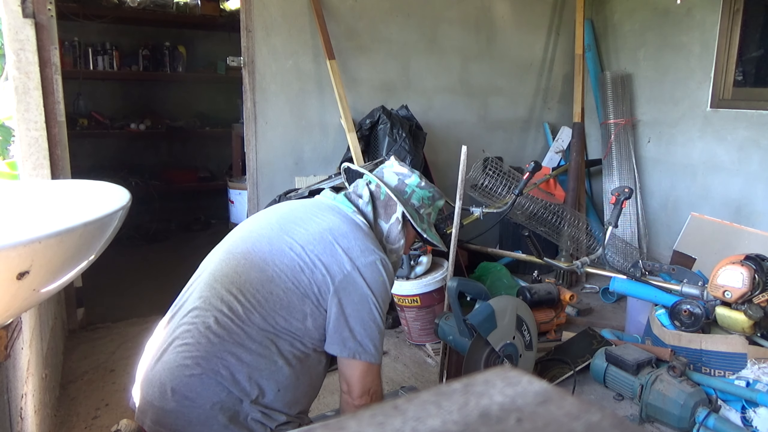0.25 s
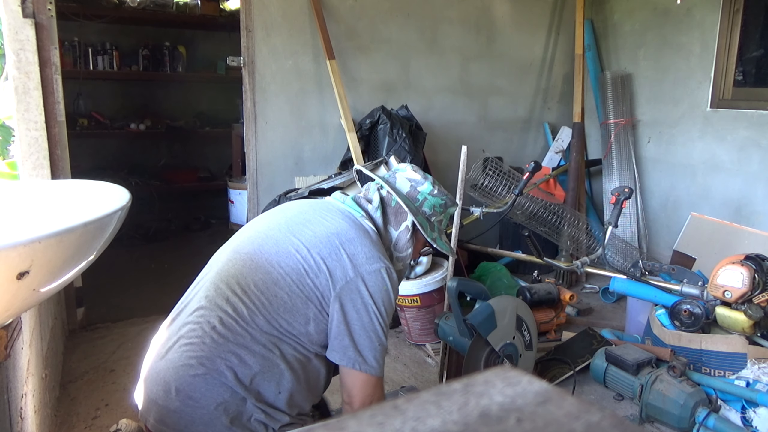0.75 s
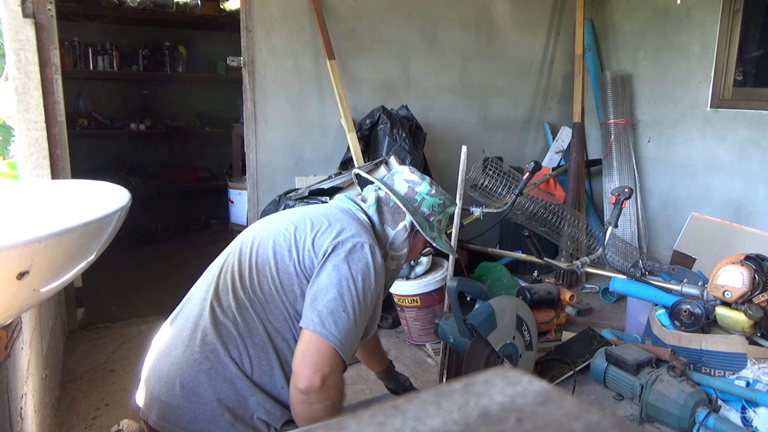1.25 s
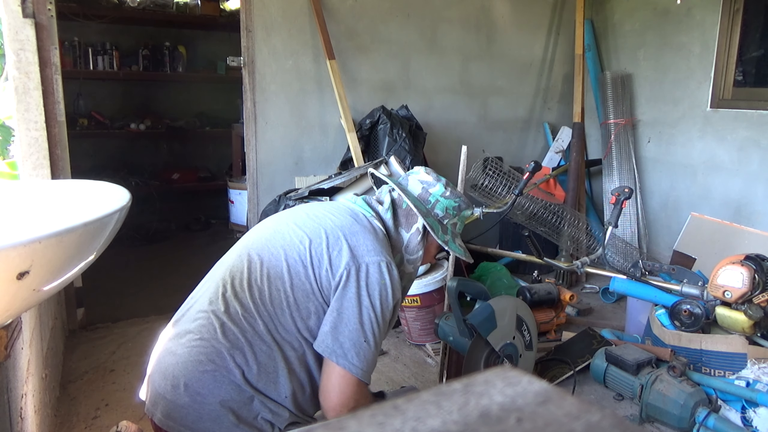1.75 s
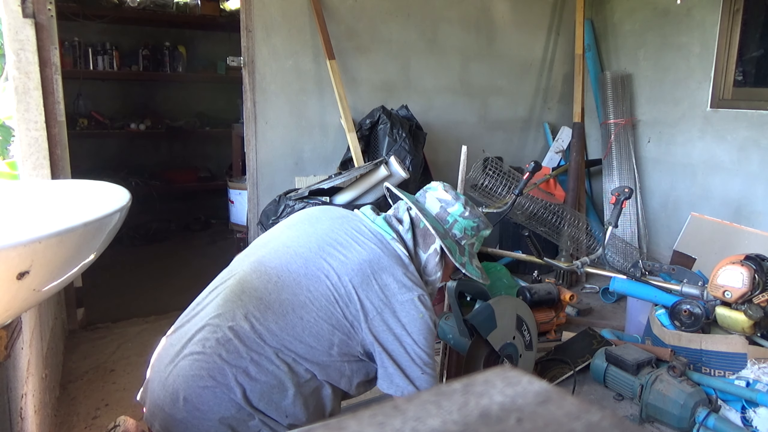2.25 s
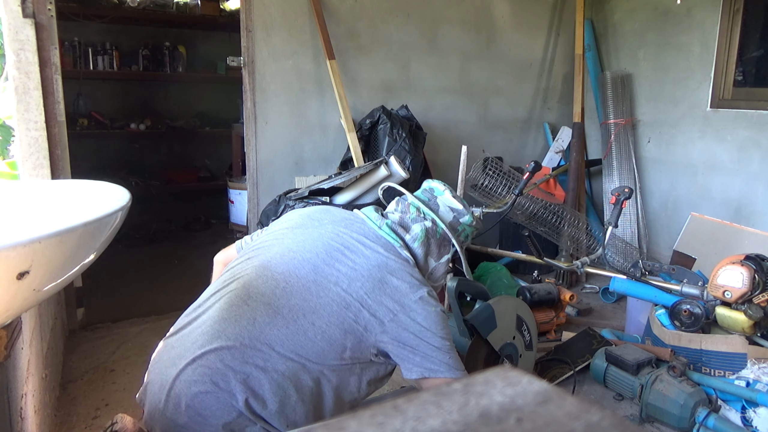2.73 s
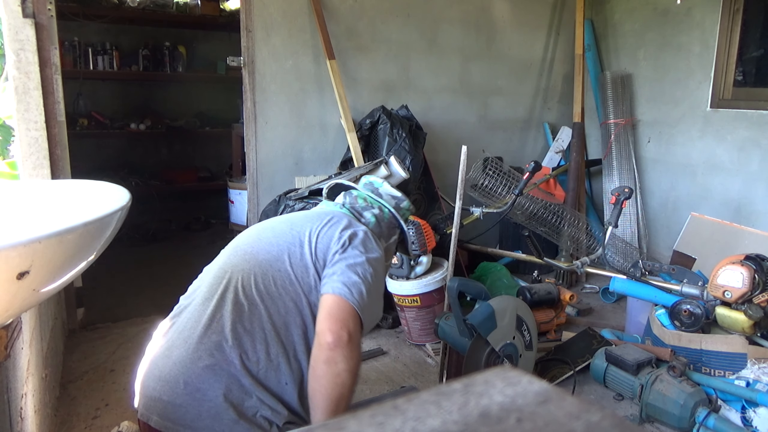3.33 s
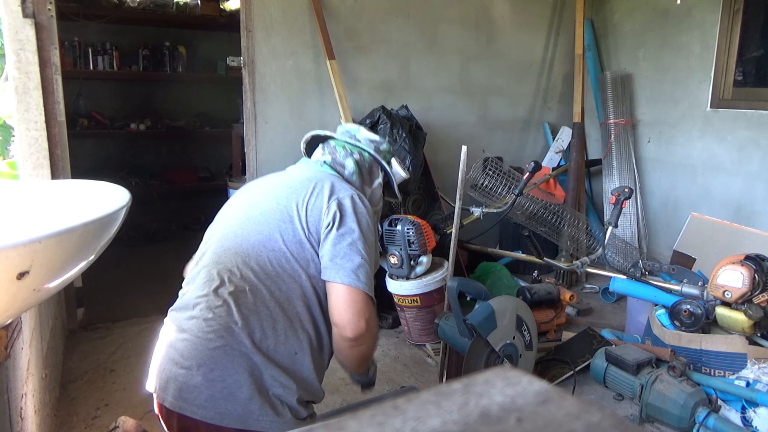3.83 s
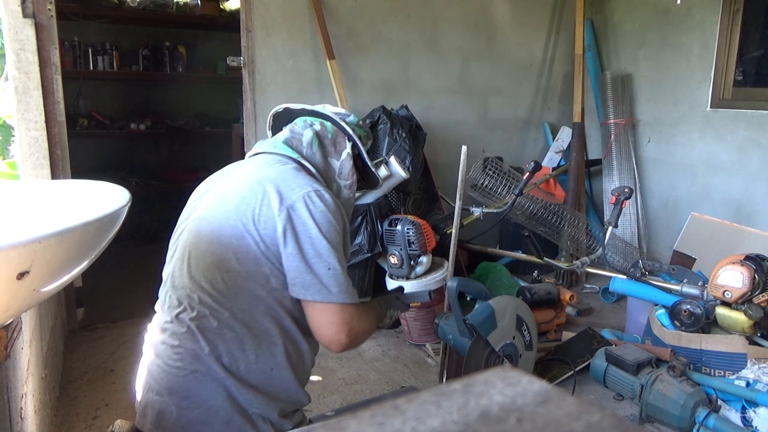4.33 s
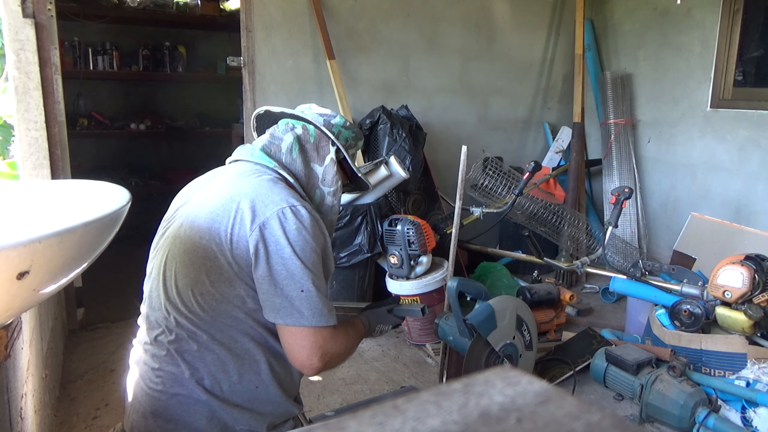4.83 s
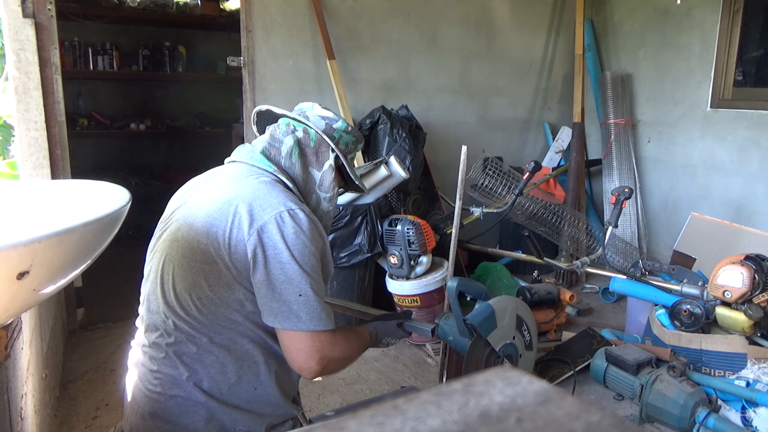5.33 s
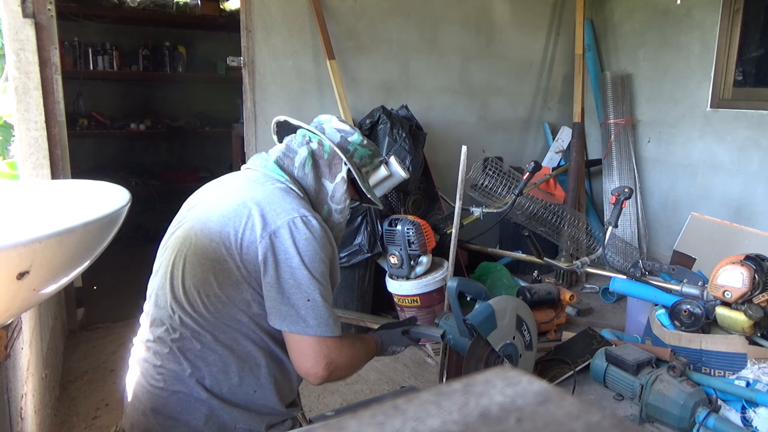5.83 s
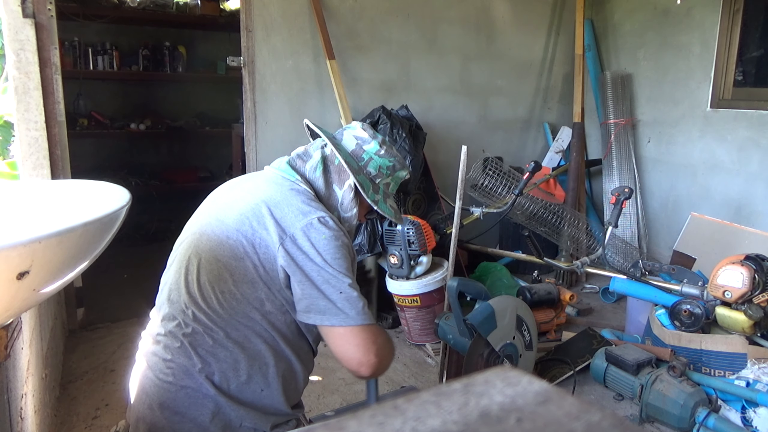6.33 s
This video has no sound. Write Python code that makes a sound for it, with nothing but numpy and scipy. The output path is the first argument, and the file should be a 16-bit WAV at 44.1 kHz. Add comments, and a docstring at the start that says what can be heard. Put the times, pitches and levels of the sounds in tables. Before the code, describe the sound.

In a small workshop, an abrasive saw coasts down, its whine sinking through bright brush hiss and gear rattle. Steel knocks, clinks and chatters on its base, then a metal tube drops in two clattering bouts, cracking and ringing. The saw fades alone to near silence, followed by light taps, a faint swish and a slide. One close microphone, short room reverberation.

```python
"""Small workshop: an abrasive chop saw coasts down, its motor tones sinking, gears rattling, brushes and bearings hissing.
At first draughts puff and steel knocks, clinks and chatters: decaying sines and noise bursts.
From 2.3 s and again from 2.9 s a length of tube drops, each contact cracking and restarting its ringing modes.
Towards the end the noise fades, taps sound, a tube is swung (noise and whistle gliding in pitch), then slides."""
import sys
import numpy as np
from scipy import signal
from scipy.fft import rfft, irfft, next_fast_len
from scipy.io import wavfile

SR = 44100
rng = np.random.default_rng(int(sys.argv[2]) if len(sys.argv) > 2 else 0)


def dump_mix(stems):
    """Bounce the given channels to the path in sys.argv[1] as a 16-bit WAV at rate SR."""
    frames = np.atleast_2d(stems).T  # one column per channel
    limited = np.clip(frames, -1, 1)  # hard clip at full scale
    pcm = np.round(limited * 32767).astype(np.int16)
    wavfile.write(sys.argv[1], SR, pcm)


N = 290178


def from_db(db):
    """Decibels to amplitude gain."""
    return 10 ** (np.asarray(db) / 20)


def rms_one(x):
    """Scale to rms 1."""
    return x / np.sqrt(np.mean(x ** 2) + 1e-20)


def in_time(rows):
    """Columns of a curve table, interpolated at every sample."""
    s, *columns = np.transpose(rows)
    return [np.interp(np.arange(N) / SR, s, column) for column in columns]


def band(x, low_hz, high_hz):
    """Butterworth band-pass."""
    edges_hz = [low_hz, min(high_hz, .45 * SR)]
    return signal.sosfilt(signal.butter(2, edges_hz, "band", fs=SR, output="sos"), x)


def drift(rate_hz):
    """Slow random wander of rms 1: noise through two equal poles, computed every 40 samples."""
    r = np.exp(-80 * np.pi * rate_hz / SR)
    noise = rng.standard_normal(N // 40 + 2002)
    slow = signal.lfilter([1], [1, -2 * r, r * r], noise)[2000:]   # settled part
    return np.interp(np.arange(N) / 40, np.arange(len(slow)), rms_one(slow))


def colour(x, spectrum=((1, 0), (2, 0)), modes_hz=(), modes_db=(), q=50):
    """Shape by a smooth spectrum with resonances standing above it."""
    size = next_fast_len(N + SR // 4)
    hz = np.arange(size // 2 + 1) * SR / size + 1
    points_hz, points_db = np.transpose(spectrum)
    smooth = from_db(np.interp(np.log(hz), np.log(points_hz), points_db))
    power = 1
    for mode_hz, mode_db in zip(modes_hz, modes_db):
        power = power + from_db(2 * mode_db) / (1 + (2 * q * (hz / mode_hz - 1)) ** 2)
    return irfft(rfft(x, size) * np.sqrt(power) * smooth, size)[:N]


def grains(per_s, spread_db):
    """Random clicks of uneven size over a bed of noise."""
    sizes = from_db(spread_db * np.minimum(rng.exponential(1, N), 5)) * rng.choice([-1, 1], N)
    clicks = sizes * (rng.random(N) < per_s / SR)
    return rms_one(clicks) + .5 * rng.standard_normal(N)


def burst(at_s, t60_s):
    """Envelope that jumps to 1 and decays exponentially."""
    age_s = np.arange(N) / SR - at_s
    return (age_s >= 0) * from_db(-60 * np.clip(age_s, 0, 1) / t60_s)


# Still workshop. Each row: frequency in Hz, relative density in dB per Hz.
SHOP_SPECTRUM = [(30, -12.5), (50, -2), (110, -10), (170, -12.5), (250, -3.5), (400, -9.5), (700, -18.5),
                 (1700, -22), (4000, -31), (7500, -30), (15600, -39.5)]
SHOP_RMS_DB = -62


def still_workshop():
    """Steady noise of a fixed spectrum."""
    return from_db(SHOP_RMS_DB) * rms_one(colour(rng.standard_normal(N), SHOP_SPECTRUM))


# Puffs. Each row: centre in seconds, level in dB, half width at 1/e in seconds.
GUSTS = [(0.056, -41.5, 0.043), (0.152, -47, .025), (0.3, -46.5, 0.11)]


def draught():
    """Air puffs on the microphone: low noise under bell-shaped envelopes."""
    t = np.arange(N) / SR
    puffs = sum(from_db(db) * np.exp(-((t - s) / width_s) ** 2) for s, db, width_s in GUSTS)
    return puffs * rms_one(band(rng.standard_normal(N), 28, 108))


# Steel on the saw base. Each row: start in seconds, level in dB, lower mode in Hz.
KNOCKS = [(0.077, -28, 603), (0.237, -41, 590), (0.454, -27.5, 640), (0.631, -24, 662), (0.74, -18.5, 492),
          (0.934, -21, 606), (1.032, -21.5, 485), (1.063, -22, 505), (1.093, -17, 545), (1.14, -28, 510),
          (1.204, -25, 626)]


def base_knocks():
    """A blow excites two neighbouring panel modes of the base, 1 : 1.35 in pitch."""
    out, age_s = np.zeros(N), np.arange(SR // 4) / SR
    for s, db, hz in KNOCKS:
        pair = np.sin(2 * np.pi * hz * age_s) + .5 * np.sin(2.7 * np.pi * hz * age_s)
        out[round(s * SR):][:len(age_s)] += from_db(db - 60 * age_s / 0.048) * pair
    return band(out, 280, 2300)


# Small clinks. Each row: start in seconds, level in dB, frequency in Hz, t60 in seconds.
CLINKS = [(0.037, -36, 2570, 0.11), (0.281, -30, 2430, 0.081), (0.281, -22, 2190, 0.071),
          (0.469, -22, 6340, 0.11), (0.495, -16.5, 9230, 0.076), (0.939, -23, 7250, 0.05),
          (1.467, -16.5, 8580, 0.051), (3.819, -33, 10700, 0.088), (3.822, -33, 2650, 0.08)]


def clinks():
    """Each is one decaying mode."""
    out, age_s = np.zeros(N), np.arange(SR // 4) / SR
    for s, db, hz, t60_s in CLINKS:
        ring = from_db(db - 60 * age_s / t60_s) * np.sin(2 * np.pi * hz * age_s)
        out[round(s * SR):][:len(age_s)] += ring
    return out


# Steel chatter. Each row: start in seconds, level in dB.
JOLTS = [(0.299, -22), (0.439, -21), (0.869, -25), (0.939, -16), (1.08, -19), (1.148, -19), (1.194, -20),
         (1.349, -17.5), (1.4, -17)]


def fence_chatter():
    """Steel chatters on the fence: short bursts of bright noise."""
    level = sum(from_db(db) * burst(s, 0.075) for s, db in JOLTS)
    return band(level * rng.standard_normal(N), 2300, 10400)


# Taps and last jolts of the wheel.
# Each row: start in seconds, level in dB, low edge in Hz, high edge in Hz, t60 in seconds.
TAPS = [(5.776, -46, 3000, 9000, 0.065), (5.829, -44.5, 3000, 11900, 0.065),
        (5.918, -48, 4470, 13000, 0.043), (6.433, -45.5, 1500, 12900, 0.074), (6.436, -49, 200, 900, 0.024),
        (6.438, -51, 3900, 4470, 0.054), (6.546, -44, 120, 1800, 0.012), (6.565, -60, 1820, 1960, 0.1)]


def taps():
    """Decaying noise bursts, each confined to its own band."""
    noise, out = rng.standard_normal(N), np.zeros(N)
    for s, db, low_hz, high_hz, t60_s in TAPS:
        tap = band(band(burst(s, t60_s) * noise, low_hz, high_hz), low_hz, high_hz)
        out += from_db(db) * tap * np.sqrt(SR / 2 / (high_hz - low_hz))   # make up for band width
    return out


# Tube sliding. Each row: time in seconds, level in dB.
SLIDE = [(6.43, -96), (6.45, -62), (6.58, -63.5)]


def tube_slide():
    """Friction as grainy bright noise."""
    level_db = np.interp(np.arange(N) / SR, *np.transpose(SLIDE), left=-200)
    return from_db(level_db) * rms_one(band(grains(1800, 3.2), 3200, 10000))


# Tube modes. Each row: family number, frequency in Hz.
FIRST_PITCHES, SECOND_PITCHES = [(0, 1791), (1, 2272), (1, 2528), (2, 3577), (2, 3655), (2, 3768),
                                 (3, 4034), (3, 4081), (4, 5373), (4, 5512), (5, 5850), (6, 7335)], [(0, 1836), (1, 2255), (2, 3461), (2, 3720), (3, 4118),
                                                   (4, 5478), (5, 5984), (5, 6292), (6, 6573), (6, 6724),
                                                   (6, 7140), (6, 7540), (6, 9985), (6, 10620)]
# Ringing of those modes. Each row: relative level in dB, t60 in seconds, rise time constant in seconds.
FIRST_MODES, SECOND_MODES = [(-2, 1.9, 0.023), (-7, 0.4, .003), (-11, 2.3, 0.028), (7, 0.96, 0.021),
                             (2.5, 1.5, 0.019), (8, 1.6, 0.009), (-7, 0.4, 0.003), (-3, 0.3, 0.0026),
                             (12, 0.97, .002), (-10.5, 0.41, .005), (-4, 0.43, 0.0014), (2, 0.71, .005)], [(3, 0.44, 0.0063), (1, 0.36, 0.0026), (4, 0.38, 0.034),
                                                 (2, 0.28, 0.017), (-2, 0.22, 0.0015), (-2, 0.13, .002),
                                                 (-3, 0.96, .002), (-7, 0.51, .002), (-0.5, 0.069, 0.0052),
                                                 (-56, 0.084, 0.0018), (-5, 0.084, .002), (-4.5, 0.1, .002),
                                                 (-4, 0.1, 0.0015), (-6, 0.084, .002)]
# Contacts. Each row: time in seconds, crack in dB, then ring in dB of families 0 to 6 after it.
FIRST_DROP, SECOND_DROP = [(2.3386, -2.5, -19, -27.5, -26.5, -10.5, -40, -15.5, -29.5),
                           (2.401, -26, -37, -43.5, -32, -25, -47, -45, -33.5),
                           (2.464, -17, -23, -26, -75, -15, -44, -52.5, -55),
                           (2.493, -32, -33, -31, -38, -17.5, -62, -19, -57),
                           (2.515, -31, -25.5, -25.5, -45.5, -27.5, -61.5, -23, -49),
                           (2.547, -13.5, -30.5, -46, -35, -19, -36, -52.5, -41.5),
                           (2.583, -37, -45.5, -23, -56, -15, -56.5, -20, -47.5),
                           (2.606, -30, -38, -25.5, -50, -20.5, -39.5, -28, -44),
                           (2.645, -12, -62, -59.5, -50, -24, -54, -42, -38),
                           (2.685, -21, -56, -57, -67, -50, -62, -60, -60)], [(2.862, -7, -41, -26.5, -28, -15, -23, -26, -20),
                                               (2.96, -23, -59, -60, -42, -50, -50, -32, -60),
                                               (3.03, -50, -63, -72, -52, -70, -69, -70, -70),
                                               (3.265, -19, -34, -66, -60, -22.5, -40, -50, -22),
                                               (3.34, -46, -51, -70, -70, -56, -70, -70, -70)]


def dropped_tube(pitches, modes, contacts):
    """Each contact cracks and resets how strongly every mode family rings until the next one."""
    rows, out = np.array(contacts), np.zeros(N)
    first = round(rows[0, 0] * SR)
    span = slice(first + 1, first + SR)
    t = np.arange(N)[span] / SR
    last = np.searchsorted(rows[:, 0], t) - 1
    age_s = t - rows[last, 0]
    for (family, hz), (db, t60_s, rise_s) in zip(pitches, modes):
        level = from_db(rows[last, 2 + family] + db - 60 * age_s / t60_s + 2 * drift(50)[span])
        r = np.exp(-1 / (max(rise_s, .0005) * SR))
        smooth_level = signal.lfilter([1 - r], [1, -r], level)
        out[span] += np.sqrt(2) * smooth_level * np.sin(2 * np.pi * hz * t + .15 * drift(45)[span])
    decay = from_db(-60 * age_s / 0.019) + 0.92 * from_db(-60 * age_s / 0.0092)
    crack = from_db(rows[last, 1]) * decay * rng.standard_normal(len(t))
    out[span] += 0.45 * band(crack, 2100, 7000) + 0.16 * band(crack, 240, 12000) + 0.097 * band(crack, 100, 1200)
    clack = from_db(rows[last, 1] - 60 * age_s / .03) * np.sin(2 * np.pi * 4110 * age_s)   # tube wall
    out[span] += .9 * clack
    return out


# Swish. Each row: time in seconds, centre in Hz, level in dB.
SWISH = [(6.12, 1188, -77.5), (6.15, 1400, -59), (6.22, 1510, -65), (6.3, 1280, -64.5), (6.35, 1010, -81)]
# Thin whistle. Each row: time in seconds, pitch in Hz, level in dB, half-pitch tone in dB.
WHISTLE = [(6.128, 11950, -94.5, -99), (6.135, 12500, -70, -99), (6.165, 15600, -72, -94),
           (6.195, 15800, -83.5, -61), (6.225, 15200, -76, -65), (6.26, 14000, -67.5, -85),
           (6.3, 11300, -67, -89.5), (6.335, 9200, -75, -99), (6.345, 8800, -99, -99)]


def swung_tube():
    """Air sheds off the tube: a noise band that follows its speed, and a gliding whistle."""
    centre_hz, swish_db = in_time(SWISH)
    carrier = np.sqrt(2) * np.sin(2 * np.pi * np.cumsum(centre_hz) / SR)
    swish = rms_one(band(band(rng.standard_normal(N), 20, 410), 20, 410)) * carrier
    pitch_hz, top_db, half_db = in_time(WHISTLE)
    cycles = np.cumsum(pitch_hz) / SR
    tones = from_db(top_db) * np.sin(2 * np.pi * cycles) + from_db(half_db) * np.sin(np.pi * cycles)
    return from_db(swish_db) * swish + from_db(3 * drift(40)) * tones


# Armature. Each row: time in seconds, speed in turns per s.
SPEED = [(0.0, 216.09), (0.5, 191.21), (1.0, 168.19), (1.5, 146.71), (2.0, 126.44), (2.5, 107.7),
         (3.0, 89.99), (3.5, 72.93), (4.0, 56.95), (4.5, 42.04), (5.0, 27.93), (5.5, 15.13), (6.0, 3.66)]
STALL_TURNS_PER_S = 24   # motor tones die away and grit stops below this


def armature_speed():
    """Coasting speed in turns per s."""
    return in_time(SPEED)[0]


# Modes of wheel and casing. Each entry: frequency in Hz; strength in dB.
CASING_HZ, CASING_DB = (1505, 1980, 2600, 2930, 3315, 4008, 4160, 4320, 4505, 4955, 5240, 5510, 5805, 6270,
                        6760, 7070, 7300, 7410, 8140, 8600, 9050, 9690, 10035, 10465, 10725, 11800, 12190,
                        13600, 13870), (6.5, 6.5, -4.5, -2.5, 3, 5, 6.5, 2, 6.5, 6.5, 6.5, -6, 4, 6.5, 2,
                                           2, 4, 1, 6, 3.5, 4.5, 3, -2.5, 1.5, 5, 3, 2.5, 1.5, 4)
CASING_Q = 77
MODE_SWELL_DB, MODE_SWELL_HZ = 2.5, 3


def casing_noise(per_s, spread_db, spectrum):
    """Grainy noise of a smooth colour, plus resonant modes that each swell and fade."""
    out = colour(grains(per_s, spread_db), spectrum)
    drive = colour(grains(per_s, spread_db), spectrum)
    for hz, db in zip(CASING_HZ, CASING_DB):
        r = np.exp(-np.pi * hz / CASING_Q / SR)
        poles = [1, -2 * r * np.cos(2 * np.pi * hz / SR), r * r]
        ring = signal.lfilter([(1 - r * r) / 2, 0, (r * r - 1) / 2], poles, drive)
        out = out + from_db(db + MODE_SWELL_DB * drift(MODE_SWELL_HZ)) * ring
    return out


PINGS_PER_S, PING_T60_S = 45, .06
PING_DB, PING_DB_PER_TURN_PER_S = -42, .065
PING_MODES = range(13, 25)   # casing modes struck


def grit_pings():
    """Grit flung off the wheel against the guard sets single high casing modes pinging."""
    speed = armature_speed()
    level = from_db(PING_DB + PING_DB_PER_TURN_PER_S * speed + rng.normal(0, 4, N))
    born = rng.random(N) < PINGS_PER_S / SR
    struck, out = rng.integers(PING_MODES.start, PING_MODES.stop, N), 0
    r = from_db(-60 / (PING_T60_S * SR))
    for k in PING_MODES:
        w = 2 * np.pi * CASING_HZ[k] / SR
        hits = level * born * (struck == k) + 1e-18
        out = out + signal.lfilter([0, np.sin(w)], [1, -2 * r * np.cos(w), r * r], hits)
    return out * (speed > STALL_TURNS_PER_S)


# Gear rattle. Each row: frequency in Hz, relative density in dB per Hz.
RATTLE_SPECTRUM = [(110, -39), (200, -13.5), (260, -3), (420, -12.5), (550, -1), (700, -2), (900, -17.5),
                   (1200, -11), (2000, -44)]
# Modes of base and guard. Each entry: frequency in Hz; strength in dB.
BASE_HZ, BASE_DB = (240, 316, 352, 390, 462, 505, 550, 635, 660, 764, 840, 1003), (4, 3.5, 6, 17.5, 17, 15, 15, 12, 10, -1, 6, 2)
BASE_Q = 22.6
# Guard buzz. Each row: time in seconds, level in dB.
BUZZ = [(0, -41.5), (1, -46), (2.4, -39), (2.9, -44), (3.6, -50.5), (4.4, -54.5), (5.5, -65.5), (6.1, -70),
        (6.3, -79)]
BUZZ_WAVER_DB = 1


def gear_rattle(gears, rattle_db):
    """Loose gears shake the modes of base and guard; the guard buzzes in a band of its own."""
    rattle = rms_one(colour(gears, RATTLE_SPECTRUM, BASE_HZ, BASE_DB, BASE_Q))
    buzz = rms_one(band(band(rattle, 747, 914), 747, 914))
    buzz_db = in_time(BUZZ)[0] + BUZZ_WAVER_DB * drift(1.43)
    return from_db(rattle_db) * rattle + from_db(buzz_db) * buzz


# Fan rush. Each row: frequency in Hz, relative density in dB per Hz.
RUSH_SPECTRUM = [(530, -13), (900, -0.5), (1390, -8), (1530, -4.5), (1850, -10), (3080, -3.5), (3380, 7),
                 (3600, 8), (4680, -19), (7920, -120)]
RUSH_DB, RUSH_DB_PER_TURN_PER_S, RUSH_FROM_TURNS_PER_S = -14.5, 0.1087, 136   # against the hiss


def fan_rush(hiss_db, shake_db):
    """Air rush that gains on the hiss at high speed."""
    speed = armature_speed()
    gain_db = RUSH_DB + RUSH_DB_PER_TURN_PER_S * np.maximum(speed - RUSH_FROM_TURNS_PER_S, 0)
    rush = rms_one(casing_noise(3000, 3.75, RUSH_SPECTRUM))
    rush = rush + speed / 90 * band(rush, 1567, 2910)   # a fast fan fills the gap near 2 kHz
    return from_db(hiss_db + gain_db + shake_db) * rush


# Brush and bearing hiss. Each row: frequency in Hz, relative density in dB per Hz.
HISS_SPECTRUM = [(1500, -82), (2500, -6), (3700, -16.5), (4100, -3.5), (6000, -1), (8000, -1), (9500, -1.5),
                 (11000, -4.5), (13000, -9.5), (14500, -12), (15700, -3)]
# Slope of the hiss about 5 kHz. Each row: time in seconds, slope in dB per octave.
BRIGHTNESS = [(0, -2), (.8, -2), (2.1, -2.5), (2.55, -2.5), (2.9, -1.5), (3.3, -2), (3.7, -1), (3.85, 0.5),
              (4.12, 1), (4.25, -1.5), (5.4, -1), (5.65, -2.5), (5.88, -8), (6.1, -1.5)]
PATCH_DB, PATCH_HZ = 1.5, 1.2   # slow swell of each band


def brush_hiss(shake_db):
    """Brushes and bearings excite wheel and casing; bands flutter partly together, partly alone."""
    hiss, slope_db = casing_noise(9000, 2.0, HISS_SPECTRUM), in_time(BRIGHTNESS)[0]
    edges_hz, bands = 2400 * 2 ** np.arange(0, 3.1, .5), 0
    for low_hz, high_hz in zip(edges_hz, edges_hz[1:]):
        tilt_db = slope_db * np.log2(low_hz / 5000)
        flutter_db = shake_db + 0.55 * drift(33) + PATCH_DB * drift(PATCH_HZ)
        bands = -bands + band(hiss, low_hz, high_hz) * from_db(tilt_db + flutter_db)   # signs join at the edges
    return rms_one(bands)


# Ringing wheel modes. Each entry: frequency in Hz; relative level in dB.
WHEEL_HZ, WHEEL_DB = (4086, 4990, 5850), (1, 4, -3.5)
WHEEL_Q = 96
WHEEL_RING_DB, WHEEL_RING_DB_PER_TURN_PER_S = -8, -0.2   # against the hiss


def wheel_ring(gears):
    """Narrow wheel modes that stand out of the hiss more as speed falls."""
    rings = 0
    for hz, db in zip(WHEEL_HZ, WHEEL_DB):
        rings = rings + from_db(db) * rms_one(band(gears, hz - hz / WHEEL_Q, hz + hz / WHEEL_Q))
    return from_db(WHEEL_RING_DB + WHEEL_RING_DB_PER_TURN_PER_S * armature_speed()) * rms_one(rings)


# Singing wheel mode. Each row: time in seconds, level in dB.
SING = [(0, -77), (.7, -49), (1.05, -39), (1.4, -53), (1.8, -34), (2.3, -43), (2.7, -60.5), (3.05, -38),
        (3.4, -45), (4.2, -57), (5, -82.5)]
SING_HZ = 10725


def wheel_sing(gears):
    """One high wheel mode swells and fades, driven by the gears."""
    return from_db(in_time(SING)[0]) * rms_one(band(gears, SING_HZ - 130, SING_HZ + 130))


# Running noise. Each row: time in seconds, gear rattle in dB, brush hiss in dB.
RUNNING_LEVELS = [(0.0, -36, -26.5), (0.99, -34, -25.5), (1.3, -37, -25), (1.65, -44, -24.5),
                  (1.85, -41.5, -24.5), (2.4, -44, -23.5), (2.86, -41, -26), (3.3, -38.5, -26.5),
                  (3.6, -39.5, -25.5), (4.12, -42, -29), (4.19, -42, -29.5), (5.07, -46, -34.5),
                  (5.46, -45.5, -38), (5.66, -48, -42.5), (5.88, -51.5, -52.5), (5.99, -52, -59),
                  (6.12, -50.5, -61), (6.27, -89, -69.5), (6.58, -83, -73)]


def running_noise():
    """Gear shaking drives rattle and wheel modes; rush and hiss flutter together."""
    rattle_db, hiss_db = in_time(RUNNING_LEVELS)
    gears = grains(900, 1.9) * from_db(2.25 * drift(32))
    shake_db = 0.91 * drift(30)
    hiss = from_db(hiss_db) * (brush_hiss(shake_db) + wheel_ring(gears))
    return gear_rattle(gears, rattle_db) + wheel_sing(gears) + fan_rush(hiss_db, shake_db) + hiss


# Tones per turn: unbalance, fan and slots, commutator bars.
WHINE_ORDERS = (1, 2, 12, 16, 32, 48, 64, 80, 96, 112, 128, 144, 160, 192, 224)
# Drive of each tone. Each row: level in dB at 100 turns per s, gain in dB per doubling of speed.
WHINE_LAW = [(-58, 14), (-65, 9), (-53, 17), (-56, 3), (-48, 4), (-54, 7), (-50, 6), (-55, 5), (-48, 5),
             (-56, 3), (-55, 3), (-57, 5), (-54, 4), (-54, 5), (-58, 4)]
# Radiation of the machine. Each row: frequency in Hz, gain in dB.
RADIATION = [(62, -14), (80, -3), (110, -4), (130, -11), (150, -11), (173, -5), (190, -1), (220, -2),
             (300, 3), (400, 0), (950, -6), (1250, -4), (1500, -5), (1780, -10), (2050, 1), (2400, 1),
             (2900, 4), (3400, 5), (3800, 0), (4300, 7), (4800, 3), (5400, 10), (6000, 1), (7000, 2),
             (8500, 2), (10500, -5), (13000, -15)]
# Swell of the main commutator tone. Each row: time in seconds, gain in dB.
BAR_SWELL = [(0, -4), (.5, -2), (.9, -4), (1.1, 2), (1.5, -3), (1.8, 4), (2.1, -4), (2.6, -8), (2.9, -8),
             (3.1, -4), (3.45, 2), (3.7, -4), (3.9, 2), (4.15, -6), (4.3, 3), (4.7, 2), (5, -2), (5.4, -6)]
BAR_ORDER, RUNOUT_DEPTH = 32, .6   # main commutator tone; once-a-turn throb of the tones above it
STALL_DB_PER_HALVING = 12


def motor_whine():
    """Tones locked to the armature weaken as it slows, and swell where machine and casing resonate."""
    speed = np.maximum(armature_speed(), 1)
    turns = np.cumsum(speed) / SR
    radiation_hz, radiation_db = np.transpose(RADIATION)
    stall_db = STALL_DB_PER_HALVING * np.log2(np.minimum(speed / STALL_TURNS_PER_S, 1))
    out = 0
    for order, (db, slope_db) in zip(WHINE_ORDERS, WHINE_LAW):
        tone_hz = order * speed
        level_db = db + slope_db * np.log2(speed / 100) + stall_db
        level_db += np.interp(np.log(tone_hz), np.log(radiation_hz), radiation_db)
        if order == BAR_ORDER:
            level_db += in_time(BAR_SWELL)[0] + drift(8)
        else:
            level_db += (3.5 if order > BAR_ORDER else 2) * drift(5)
        throb = 1 + (order > BAR_ORDER) * RUNOUT_DEPTH * np.cos(2 * np.pi * (turns + rng.random()))
        tone = np.sqrt(2) * np.sin(2 * np.pi * order * turns)
        out = out + (tone_hz < 18000) * from_db(level_db) * throb * tone
    return colour(out, modes_hz=CASING_HZ, modes_db=CASING_DB, q=CASING_Q)


ROOM_T60_S, ROOM_DB, WALL_CUT_HZ = 0.38, -15, 3800


def room(x):
    """Direct sound plus a dense, dying tail from walls that reflect little treble."""
    age_s = np.arange(SR // 2) / SR
    tail = rng.standard_normal(len(age_s)) * from_db(-60 * age_s / ROOM_T60_S) * (age_s > .004)
    tail = signal.lfilter(*signal.butter(1, WALL_CUT_HZ, fs=SR), tail)
    tail = tail / np.sqrt(np.sum(tail ** 2))
    return x + from_db(ROOM_DB) * signal.fftconvolve(x, tail)[:N]


def scene():
    """Everything reaches one microphone; both channels carry it."""
    tubes = dropped_tube(FIRST_PITCHES, FIRST_MODES, FIRST_DROP)
    tubes += dropped_tube(SECOND_PITCHES, SECOND_MODES, SECOND_DROP)
    handling = base_knocks() + clinks() + fence_chatter() + taps() + tube_slide()
    saw = motor_whine() + grit_pings() + running_noise()
    mid = room(saw + handling + .5 * tubes) + .5 * tubes   # the tubes lie nearer: half as much room
    mid += swung_tube() + draught() + still_workshop()
    return np.array([mid, mid])


CLIP_LEVEL, CUTOFF_HZ = .8, 15580


def record(dry):
    dry = signal.sosfilt(signal.butter(4, 36, "high", fs=SR, output="sos"), dry)
    clipped = np.clip(dry, -CLIP_LEVEL, CLIP_LEVEL)
    return signal.sosfilt(signal.ellip(14, .5, 70, CUTOFF_HZ, fs=SR, output="sos"), clipped)


dry = scene()
out = record(dry)
dump_mix(out)
```